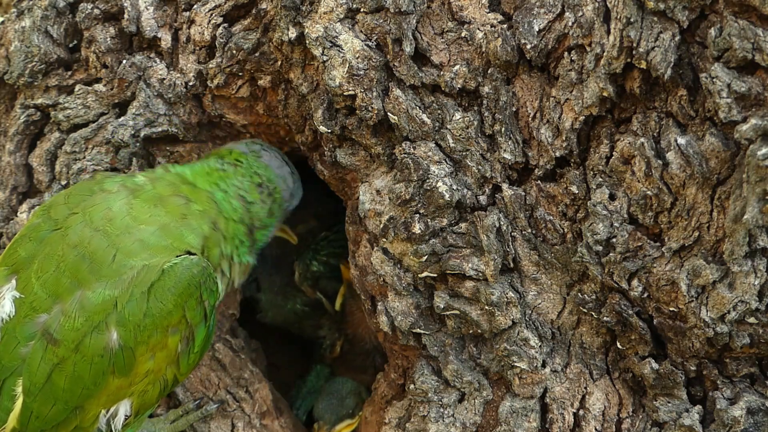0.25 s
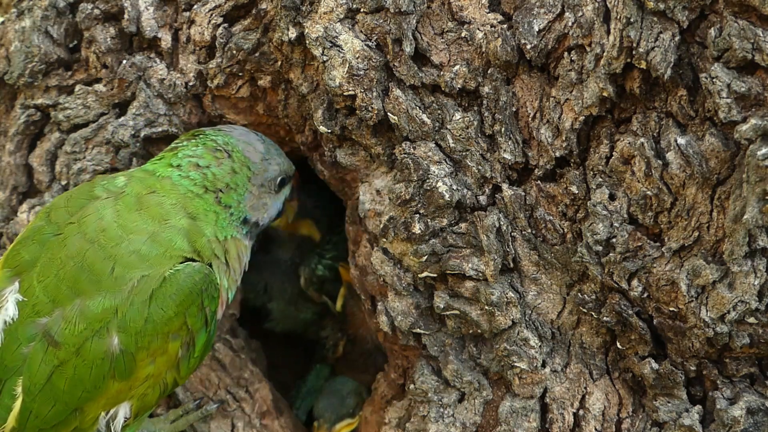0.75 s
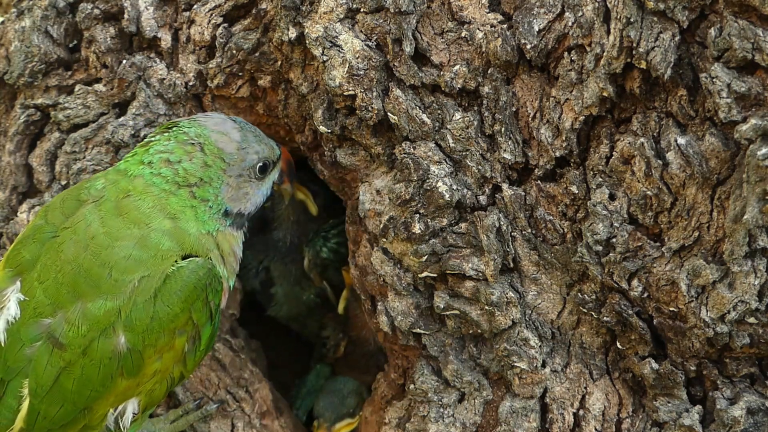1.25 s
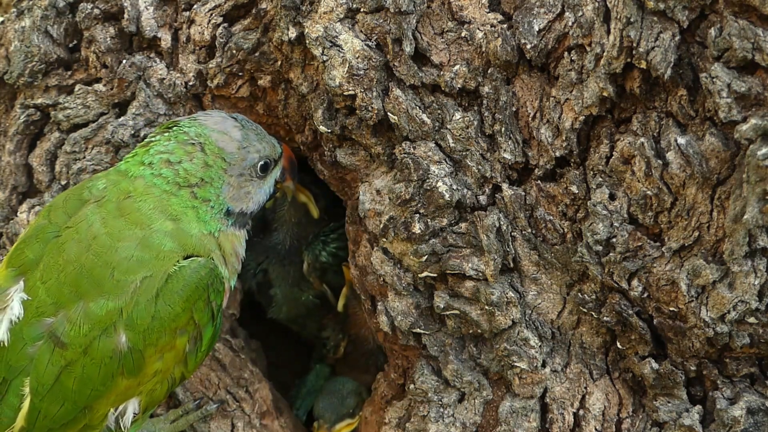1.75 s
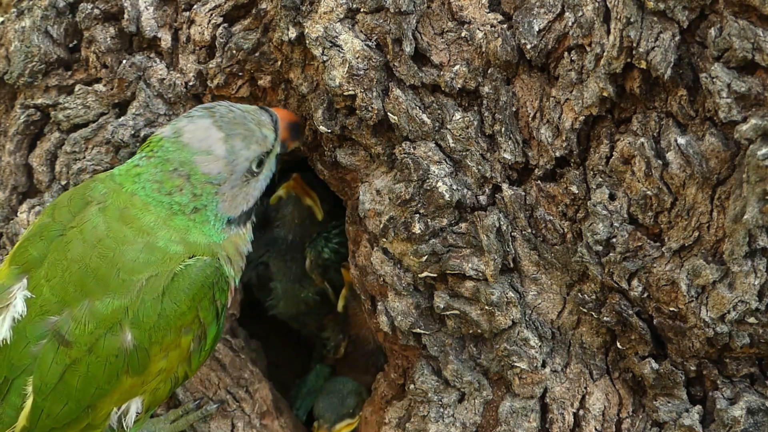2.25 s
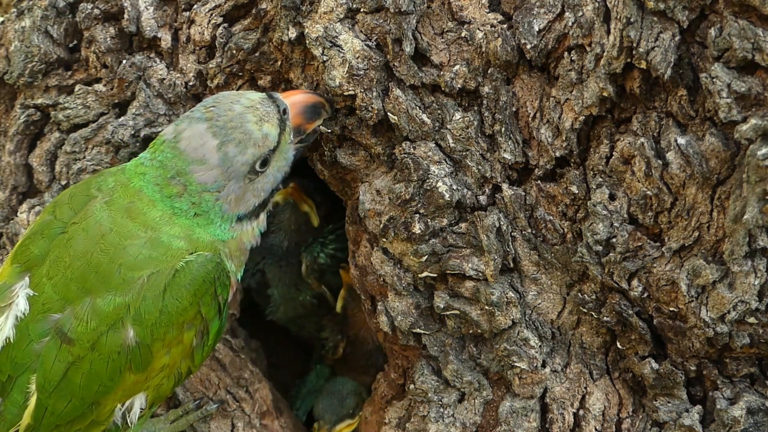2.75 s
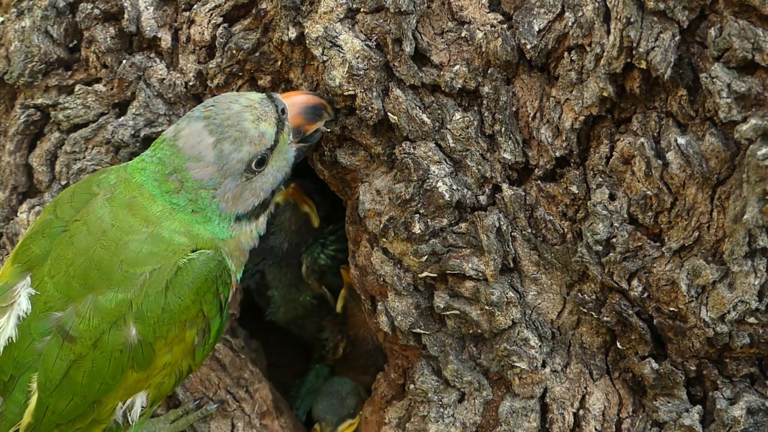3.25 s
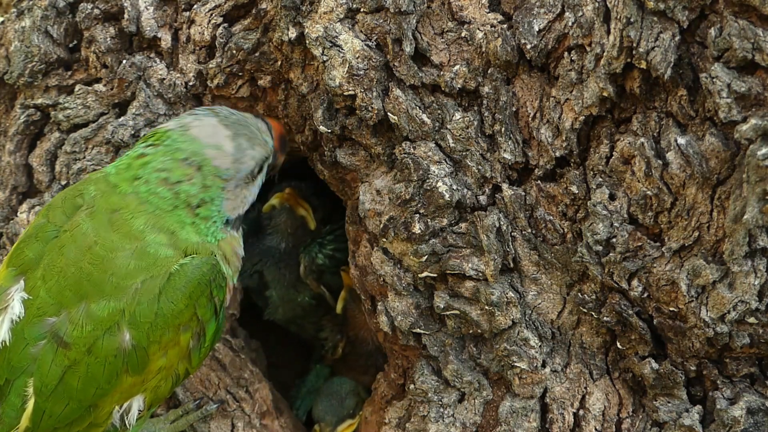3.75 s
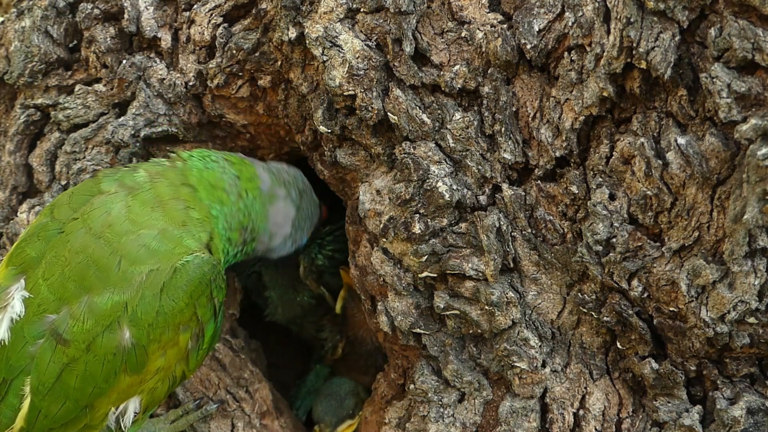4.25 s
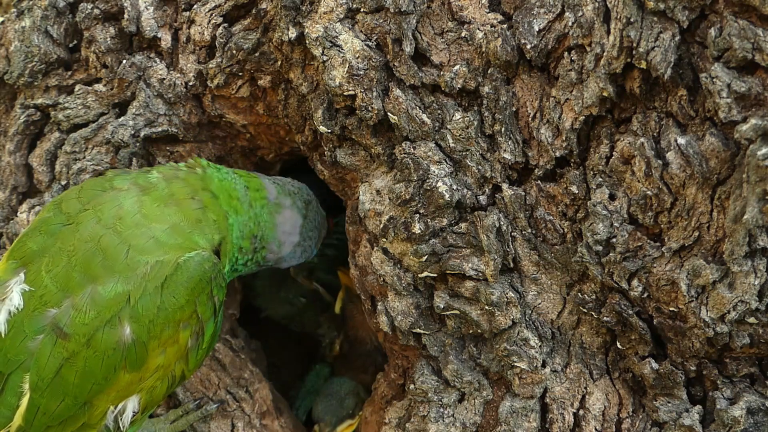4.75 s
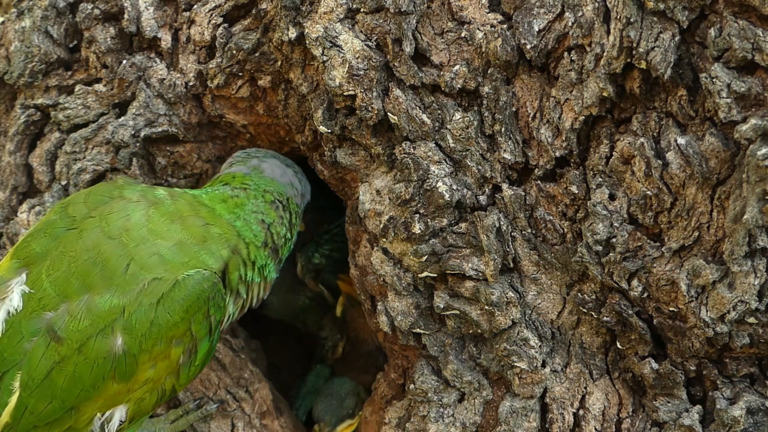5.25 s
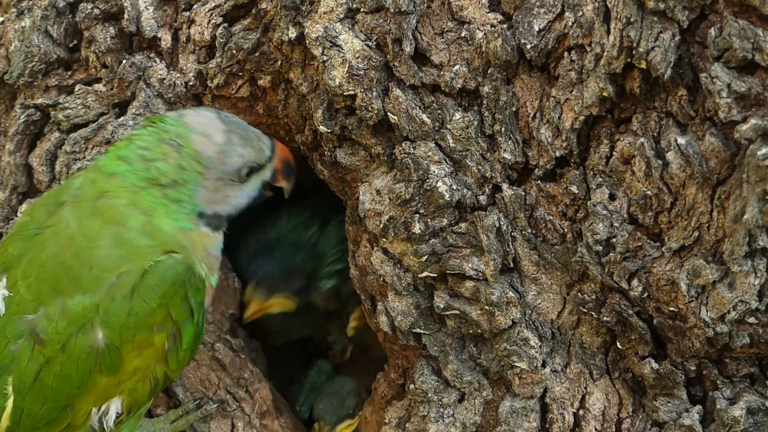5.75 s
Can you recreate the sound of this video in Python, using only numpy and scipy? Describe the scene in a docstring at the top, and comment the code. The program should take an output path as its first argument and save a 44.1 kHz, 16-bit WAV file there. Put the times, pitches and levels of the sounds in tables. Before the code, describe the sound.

Close, high, scratchy chirps start at once and continue irregularly throughout, from two nestlings in a small wooden cavity that adds a brief ring. Little stray whistles slip in and between them. Near one second a far bird gives two faint hoarse calls while plumage rustles softly. Later, barely audible dry claw ticks touch bark. A gentle, wide outdoor rush lies beneath.

```python
"""Two parakeet nestlings beg from a tree hollow, one deep inside, one at the entrance, in soft outdoor air.
From the start both chirp: two syrinx voices sweep up, down, up, down together amid rasp and a low croak;
stray whistles fall in and between the chirps. The wooden cavity rings briefly after each sound inside.
Around 0.9 and 1.4 s a far bird gives hoarse calls of shaped noise; near 1.3 s plumage rustles.
From 2 s on a few claw ticks, short decaying noise, strike the bark."""
import sys
import numpy as np
from scipy import signal
from scipy.fft import rfft, irfft, next_fast_len
from scipy.io import wavfile
from scipy.ndimage import map_coordinates

SR = 44100
rng = np.random.default_rng(int(sys.argv[2]) if len(sys.argv) > 2 else 0)


def pcm_store(signal):
    """Save signal as 16-bit PCM."""
    levels = np.round(np.clip(np.atleast_2d(signal), -1, 1) * 32767)
    wavfile.write(sys.argv[1], SR, levels.astype(np.int16).T)


N = 264600  # 6 s

# Chirps: (time of top note [s], start to top note [s], top note to end [s], pitch factor [ratio],
# effort [dB], opening peep [dB])
DEEP_CHIRPS = [(.080, 0.063, 0.033, 1.004, 6.5, -61), (1.155, 0.075, 0.031, 0.96, -11, -63),
               (1.286, 0.069, .029, 0.95, -2, -66), (2.266, 0.071, 0.033, 0.97, -2, -64),
               (2.388, 0.065, 0.032, 0.98, 8, -58), (3.580, 0.068, 0.031, 1.015, 4, -42),
               (3.708, .05, .032, .986, 6.5, -58), (4.760, 0.071, 0.026, 1, -11.5, -58),
               (5.020, 0.073, 0.024, 1.002, 2.5, -52), (5.928, 0.11, 0.023, 0.98, 2, -58)]
FRONT_CHIRPS = [(.199, 0.071, .029, 1.007, -3.5, -58), (.557, 0.067, 0.033, 1.01, -2.5, -43.5),
                (.726, 0.076, 0.039, 0.98, -0.5, -38), (1.502, 0.074, 0.031, 1.026, -0.5, -65),
                (1.667, 0.075, 0.036, 0.98, 0, -50), (2.321, 0.11, .03, 0.99, -2, -58),
                (2.819, .073, 0.03, 1.015, -3, -46), (3.019, .066, 0.035, 0.96, -2.5, -44),
                (3.766, 0.051, 0.026, 1.007, -1, -58), (3.962, .069, 0.034, 0.99, 0, -42.5),
                (4.479, 0.071, 0.033, 1.018, -2.5, -46), (4.699, 0.069, 0.027, 0.98, -1, -40),
                (5.302, .073, 0.03, 1.004, -0.5, -57), (5.558, 0.074, .032, 1.018, 2.5, -46),
                (5.810, 0.082, 0.033, 1.008, 8.5, -72)]
# Pitch of high_hz and low_hz voice: (start [Hz], crest [Hz], dip [Hz], top note [Hz], end [Hz]),
# before the pitch factor
DEEP_PITCH_HZ = dict(high_hz=(4800, 6180, 4900, 6720, 4900), low_hz=(2950, 3770, 2920, 4230, 3300))
FRONT_PITCH_HZ = dict(high_hz=(4800, 6250, 5500, 6850, 5020), low_hz=(3150, 3760, 3290, 4240, 3410))
# Envelopes of high, low, rasp: attack until full_s before the top note, then sag; release from hold_s
# after it. (attack [dB/s], full [s], sag [dB/s], hold [s], release [dB/s]), on a typical chirp's clock
DEEP_ENVELOPES = dict( high=dict(attack_db_per_s=551, full_s=.02, sag_db_per_s=268, hold_s=0.017, release_db_per_s=1500),
                  low=dict(attack_db_per_s=768, full_s=0.027, sag_db_per_s=172, hold_s=0.024, release_db_per_s=1500),
                  rasp=dict(attack_db_per_s=500, full_s=0.053, sag_db_per_s=14, hold_s=0.001, release_db_per_s=606))
FRONT_ENVELOPES = dict( high=dict(attack_db_per_s=740, full_s=0.029, sag_db_per_s=58, hold_s=0.015, release_db_per_s=1450),
                   low=dict(attack_db_per_s=640, full_s=.022, sag_db_per_s=90, hold_s=.028, release_db_per_s=800),
                   rasp=dict(attack_db_per_s=480, full_s=0.049, sag_db_per_s=8, hold_s=0.024, release_db_per_s=600))
# Base level at effort 0: (high [dB], low [dB], rasp [dB])
DEEP_MIX_DB = dict(high_db=-25.2, low_db=-27.2, rasp_db=-44.5)
FRONT_MIX_DB = dict(high_db=-27, low_db=-38, rasp_db=-47.6)
# Response to effort: (low voice's share [ratio], rasp's share [ratio], swell of the voices [1/s])
DEEP_EFFORT = dict(low=.28, rasp=.55, swell_per_s=13)
FRONT_EFFORT = dict(low=.45, rasp=.8, swell_per_s=1)
# Rasp spectrum of each throat, relative: (frequency [Hz], density [dB per Hz])
DEEP_RASP = [(90, -39), (600, -6.5), (1400, -6.5), (2150, -3), (2650, -8), (3100, 3), (4000, 8.5),
             (4500, -2), (5200, 3), (6500, 0), (7600, -4), (9900, -17), (11000, -18.5), (15500, -50)]
FRONT_RASP = [(90, -51), (600, -5.5), (1900, -4), (2650, -10.5), (3400, 5), (4200, -2), (5300, 7.5),
              (6700, 4.5), (7500, -1), (9000, -6), (10600, -7.5), (11800, -11.5), (13300, -9), (15000, -35)]
# Overtones let out by each beak, relative: (frequency [Hz], response [dB])
DEEP_BEAK = [(7500, -78), (8600, -28.5), (9800, -25), (11000, -71), (13000, -59), (15000, -50)]
FRONT_BEAK = [(7500, -68), (9000, -40), (10600, -15.5), (11800, -37.5), (13300, -16.5), (15000, -58)]
# Undertone shape, relative: (time from top note [s], level [dB])
DEEP_CROAK = [(-.06, 3), (-.04, 1), (.008, 1), (.03, -37)]
FRONT_CROAK = [(-.072, -26), (-.058, -1), (-.042, 10.5), (-.03, 0), (.012, -21.5), (.024, 8.5), (.04, -100)]
# Stray whistles where a voice splits or starts early: (time [s], length [s], pitch [Hz], level [dB])
STRAY_WHISTLES = [(.006, 0.019, 6400, -47.5), (1.096, 0.019, 3250, -41.5), (1.209, 0.014, 5850, -50),
                  (2.274, 0.017, 5120, -27), (3.631, 0.0054, 4100, -38), (3.641, 0.047, 5800, -43),
                  (4.705, 0.03, 3250, -32), (4.972, .056, 2250, -42.5), (5.862, 0.024, 2140, -38)]
# Claws on bark, relative: (time [s], level [dB])
CLAW_TICKS = [(1.968, -56.5), (2.529, -55), (2.569, -55.5), (5.4, -62)]
# Tick spectrum, relative: (frequency [Hz], density [dB per Hz])
BARK_SPECTRUM = [(50, -56), (400, 9), (1000, -9), (2000, -6), (5000, -19), (14000, -29)]
# Decay of the cavity's tail: (frequency [Hz], t60 [s])
HOLLOW_T60 = [(500, 0.081), (3000, .16), (6000, 0.17), (12000, 0.014)]
# Plumage rustle: (time [s], level [dB])
FEATHER_LEVEL = [(1.18, -90), (1.27, -64), (1.4, -63), (1.53, -90)]
# Rustle spectrum, relative: (frequency [Hz], density [dB per Hz])
FEATHER_SPECTRUM = [(500, -44), (4000, 9), (10000, 13), (14500, 3), (16000, -23)]
# Far calls: (time [s], level [dB])
FAR_BIRD_LEVEL = [(.74, -85), (.85, -61), (.95, -63), (1.12, -85), (1.26, -80), (1.34, -62), (1.41, -66),
                  (1.5, -85)]
# Far call spectrum, relative: (frequency [Hz], density [dB per Hz])
FAR_BIRD_SPECTRUM = [(100, -68), (1400, -13), (2150, 1), (2500, 0), (2950, -1), (4200, -17), (9000, -45)]
# Outdoor rush before its layer gains: (time [s], level [dB])
AIR_LEVEL = [(0.0, -57), (0.32, -61), (1.07, -60.5), (1.29, -59), (1.92, -62), (2.22, -61.5), (2.4, -59),
             (2.59, -61), (3.44, -62), (3.74, -59.5), (4.18, -62.5), (6.0, -59.5)]
# Rush spectra, in phase and in opposite phase in the two channels, relative:
# (frequency [Hz], density [dB per Hz])
AIR_MID = [(15, -80), (25, -31), (107, -3.5), (209, -2), (274, -1), (389, -1), (433, -0.5), (598, -4.5),
           (703, -5.5), (1530, -14.5), (1660, -13), (1850, -14.5), (4380, -13), (6550, -17.5),
           (15500, -20.5)]
AIR_SIDE = [(15, -54), (25, -32.5), (215, -6), (260, -10.5), (331, -5.5), (421, -10.5), (509, -10.5),
            (919, -17.5), (997, -19), (1240, -20.5), (1380, -21.5), (4380, -33), (5280, -39), (8810, -39),
            (15500, -41.5)]

RISE_S, DROP_S, LEAP_S = .021, .0215, .0105  # start to crest, crest to dip, dip to top note
HIGH_FALL_S, LOW_FALL_S = .025, .021
EASE = .6  # slowing at each pitch turn, 0 = none
SCOOP_PER_S = 4  # creep of the pitch before the rise, as a share of itself per second
LEAD_S, TAIL_S = .072, .033  # a typical chirp before and after its top note
PEEP_S = .0081
TOP_HZ = 15700


def chick(calls, pitch_hz, envelopes, mix_db, effort, throat, beak, octave_db, beat_db, overtone_db):
    """Two rough syrinx voices with their combination tones and overtones, and air rasping past them."""
    voice, overtones, blow = np.zeros((3, N))
    t = np.arange(-SR // 10, SR // 14) / SR
    size = len(t)
    crest_s = DROP_S + LEAP_S
    for top_s, lead_s, tail_s, pitch_factor, effort_db, peep_db in calls:
        # Only the run-up to the crest and the last fall are hurried or drawn out.
        run_up = (t + crest_s) * (LEAD_S - crest_s) / (lead_s - crest_s) - crest_s
        clock = np.where(t < -crest_s, run_up, t)
        clock = np.where(t > 0, t * TAIL_S / tail_s, clock)
        gate = amp(-5000 * np.abs(t - np.clip(t, -lead_s, tail_s)))
        high_hz = pitch_factor * glide(clock, pitch_hz["high_hz"], HIGH_FALL_S)
        low_hz = pitch_factor * glide(clock, pitch_hz["low_hz"], LOW_FALL_S)

        # The membranes flap irregularly until the crest, then settle into cleaner whistles.
        unrest = np.interp(t, [-crest_s - .012, -crest_s], [.045, .008])
        high_phase = phase(high_hz * (1 + unrest * wobble(2500, size)))
        low_phase = phase(low_hz * (1 + 1.2 * unrest * wobble(2500, size)))

        # A strong chirp grows and a weak one sags; effort tells most on the high voice.
        push_db = effort_db * (1 + effort["swell_per_s"] * np.clip(t + LEAP_S, -.025, .025))
        high_db = mix_db["high_db"] + push_db + envelope(clock, **envelopes["high"])
        low_db = mix_db["low_db"] + effort["low"] * push_db + envelope(clock, **envelopes["low"])
        rasp_db = mix_db["rasp_db"] + effort["rasp"] * effort_db + envelope(clock, **envelopes["rasp"])
        high = amp(high_db + wobble(194.4, size))
        low = amp(low_db + wobble(164.0, size))
        both = np.sqrt(high * low)
        peep = amp(peep_db) * arch(t + lead_s, PEEP_S)

        tones = (high + peep) * np.sin(high_phase) + low * np.sin(low_phase)
        # The throat passes the low voice's octave well only below about 7 kHz.
        octave_pass = amp(octave_db) / (1 + (2 * low_hz / 7200) ** 15)
        tones += both * octave_pass * np.sin(2 * low_phase)
        # Coupling of the voices: tones at the gap and, in the overtones, the sum of their pitches.
        tones += both * amp(beat_db) * np.sin(high_phase - low_phase)
        upper = high * np.sin(2 * high_phase)
        upper += both * (np.sin(high_phase + low_phase) + np.sin(3 * low_phase))

        rough_tones = gate * tones * (1 + .08 * wobble(1800, size))
        add(voice, top_s + t[0], bounce(rough_tones, gain=.22))
        add(overtones, top_s + t[0], gate * upper * (.6 + .42 * wobble(2200, size)))
        add(blow, top_s + t[0], gate * amp(rasp_db))
    treble = filtered(overtones, lambda hz: amp(along(beak, hz) + overtone_db))
    rasp = blow * unit(noise(throat) * amp(2.5 * wobble(700, N)))
    return voice + treble + rasp


def glide(t, turns_hz, fall_s):
    """Pitch scooping up, then sliding from turn to turn and slowing at each; t = 0 at the top note."""
    turns_s = [-LEAP_S - DROP_S - RISE_S, -LEAP_S - DROP_S, -LEAP_S, 0, fall_s]
    steps = np.arange(len(turns_s))
    place = np.interp(t, turns_s, steps)
    eased = place - EASE * np.sin(2 * np.pi * place) / (2 * np.pi)
    scoop = 1 + SCOOP_PER_S * np.minimum(t - turns_s[0], 0)
    return scoop * np.interp(eased, steps, turns_hz)


def envelope(t, attack_db_per_s, full_s, sag_db_per_s, hold_s, release_db_per_s):
    """Attack, sagging hold and release, in dB; t = 0 at the top note."""
    attack_db = attack_db_per_s * np.minimum(t + full_s, 0)
    sag_db = sag_db_per_s * np.maximum(t + full_s, 0)
    release_db = release_db_per_s * np.maximum(t - hold_s, 0)
    return attack_db - sag_db - release_db


def bounce(x, gain):
    """One echo off the wall beside a moving head: gliding tones ripple as they cross its notches."""
    lag = round(rng.uniform(.0008, .0018) * SR)
    return x + gain * np.pad(x, (lag, 0))[:len(x)]


def croak(calls, shape, level_db, pitch_hz):
    """A wavering sine undertone beneath each chirp."""
    t = np.arange(N) / SR
    shape_s, shape_db = np.transpose(shape)
    level = sum(amp(np.interp(t - top_s, shape_s, shape_db, left=-120, right=-120)) for top_s, *_ in calls)
    hz = pitch_hz * (1 + .025 * wobble(160, N) + .08 * wobble(1200, N))
    return amp(level_db) * level * amp(3.3 * wobble(200, N)) * np.sin(phase(hz))


def whistles():
    """Short sines of unsteady pitch in and between the chirps."""
    out, t = np.zeros(N), np.arange(SR // 10) / SR
    for start_s, length_s, pitch_hz, level_db in STRAY_WHISTLES:
        hz = pitch_hz * (1 + .02 * wobble(150, len(t)) + .04 * wobble(1500, len(t)))
        add(out, start_s, amp(level_db) * arch(t, length_s) * np.sin(phase(hz)))
    return out


def claws():
    """Small dry ticks on the bark: noise decaying 60 dB in 42 ms."""
    touch, t = np.zeros(N), np.arange(SR // 10) / SR
    for start_s, level_db in CLAW_TICKS:
        add(touch, start_s, amp(level_db + 4.5 - 60 * t / .042))
    return touch * noise(BARK_SPECTRUM)


def hollow(x, early_db, late_db, early_t60_s):
    """Close wooden walls answer at once, then a weak tail spreads to both sides."""
    hz, t, z = signal.stft(rng.standard_normal((2, SR // 4)), SR, nperseg=256)
    decay = amp(-60 * t / along(HOLLOW_T60, hz)[:, None])
    tail = signal.istft(z * decay, SR, nperseg=256)[1]
    t = np.arange(tail.shape[1]) / SR
    walls = rng.standard_normal(len(t)) * amp(-60 * t / early_t60_s) * (t > .0005)
    early = amp(early_db) * walls / np.linalg.norm(walls)
    late = amp(late_db) * tail / np.linalg.norm(tail[0])
    return x + signal.fftconvolve(x[None], early + late, axes=1)[:, :N]


def feathers():
    """A faint, high rustle of plumage: noise with a jittering level."""
    level_db = over_time(FEATHER_LEVEL) + 2.8 * wobble(99.5, N)
    return amp(level_db) * noise(FEATHER_SPECTRUM)


def far_bird():
    """Two hoarse distant calls: mid-band noise with soft edges and an unsteady level."""
    level_db = over_time(FAR_BIRD_LEVEL) + 2.3 * wobble(29.5, N)
    return amp(level_db) * noise(FAR_BIRD_SPECTRUM)


def air():
    """A soft outdoor rush; its low part is mostly in opposite phase in the two channels."""
    mid = amp(2.5) * noise(AIR_MID)
    side = amp(9.5) * noise(AIR_SIDE)
    channel_gain = amp([[-1], [1]])  # left, right [dB]
    return amp(over_time(AIR_LEVEL)) * np.array([mid + side, mid - side]) * channel_gain


def amp(db):
    """Decibels to gain."""
    return 10 ** (np.asarray(db) / 20)


def unit(x):
    """Scale to rms 1."""
    return x / np.sqrt(np.mean(x ** 2) + 1e-20)


def phase(hz):
    """Running phase [rad] of a varying pitch."""
    return 2 * np.pi * np.cumsum(hz) / SR


def along(points, hz):
    """(frequency [Hz], value) points read on a log frequency axis."""
    f, v = np.transpose(points)
    return np.interp(np.log(hz + 1), np.log(f), v)


def over_time(points):
    """(time [s], level [dB]) points read at every sample."""
    return np.interp(np.arange(N) / SR, *np.transpose(points))


def filtered(x, response):
    """x times a response of frequency."""
    m = next_fast_len(x.shape[-1] + 8192)
    spectrum = rfft(x, m) * response(np.fft.rfftfreq(m, 1 / SR))
    return irfft(spectrum, m)[..., :x.shape[-1]]


def noise(spectrum):
    """Coloured noise of rms 1."""
    return unit(filtered(rng.standard_normal(N), lambda hz: amp(along(spectrum, hz))))


def wobble(rate_hz, size):
    """A smooth random curve, rate_hz knots a second."""
    return map_coordinates(rng.standard_normal(size), [np.arange(size) * rate_hz / SR], mode="wrap")


def arch(t, length_s):
    """A rounded swell from 0 to length_s."""
    u = np.clip(t / length_s, 0, 1)
    return 2 * np.sqrt(u * (1 - u))


def add(track, start_s, sound):
    """Mix a sound into the track from start_s, cut at the track's ends."""
    i = round(start_s * SR)
    part = sound[max(-i, 0):len(track) - i]
    track[max(i, 0):][:len(part)] += part


def scene():
    """Both chicks in their hollow, with the outdoors around."""
    deep = chick(DEEP_CHIRPS, DEEP_PITCH_HZ, DEEP_ENVELOPES, DEEP_MIX_DB, DEEP_EFFORT, DEEP_RASP, DEEP_BEAK,
                 octave_db=-9, beat_db=-23, overtone_db=2.5)
    front = chick(FRONT_CHIRPS, FRONT_PITCH_HZ, FRONT_ENVELOPES, FRONT_MIX_DB, FRONT_EFFORT, FRONT_RASP,
                  FRONT_BEAK, octave_db=-5, beat_db=-25, overtone_db=-.5)
    deep_croak = croak(DEEP_CHIRPS, DEEP_CROAK, level_db=-53, pitch_hz=2033)
    front_croak = croak(FRONT_CHIRPS, FRONT_CROAK, level_db=-56, pitch_hz=1890)
    inside = deep + front + deep_croak + front_croak + whistles() + claws()
    nest = hollow(inside, early_db=-16, late_db=-19, early_t60_s=.03)
    nest_gain = amp([[-.1], [-.7]])  # left, right [dB]
    return nest * nest_gain + feathers() + far_bird() + air()


def record(dry):
    """Sharp band limit: nothing passes from TOP_HZ up."""
    return filtered(dry, lambda hz: hz < TOP_HZ)


dry = scene()
out = record(dry)
pcm_store(out)
```